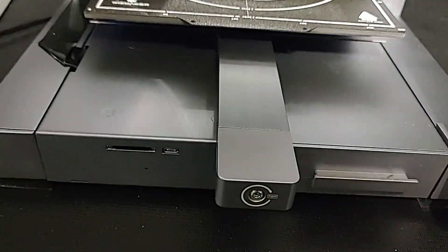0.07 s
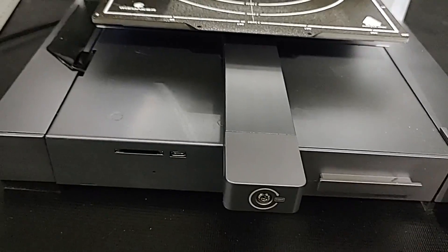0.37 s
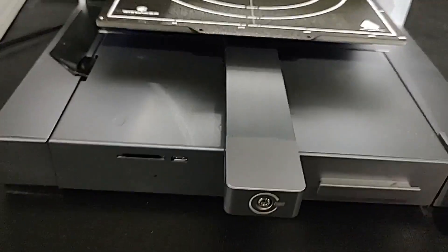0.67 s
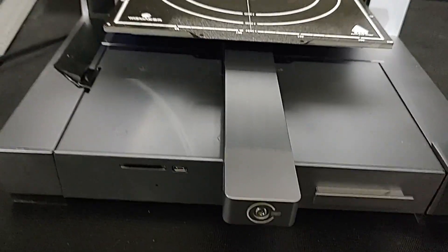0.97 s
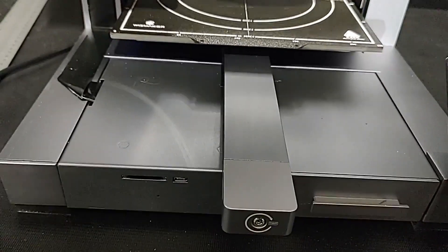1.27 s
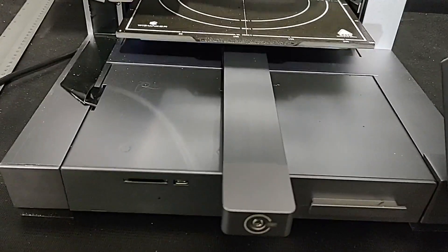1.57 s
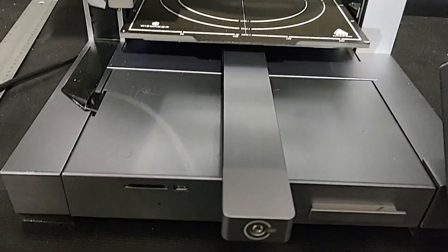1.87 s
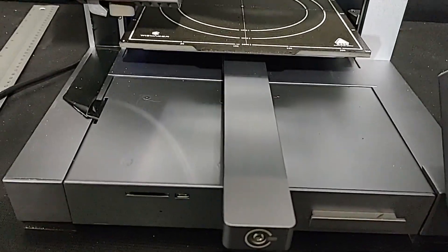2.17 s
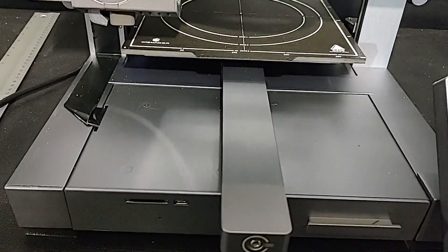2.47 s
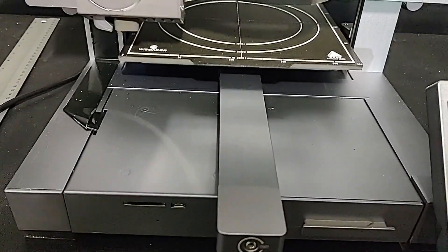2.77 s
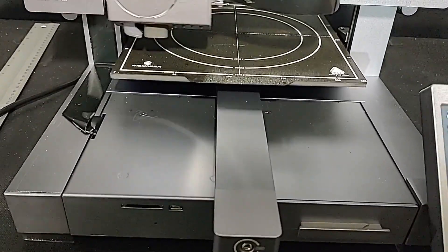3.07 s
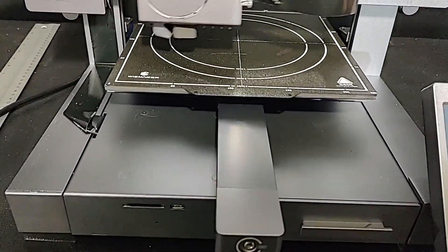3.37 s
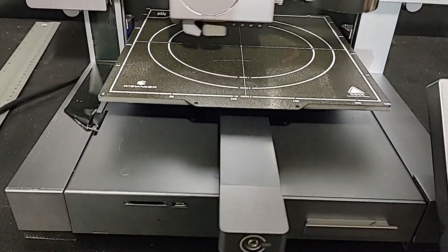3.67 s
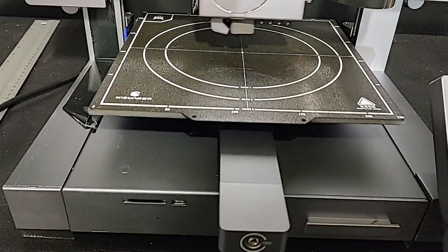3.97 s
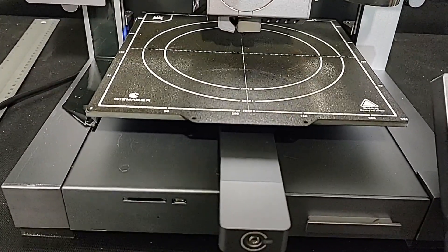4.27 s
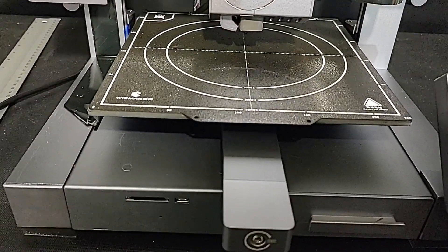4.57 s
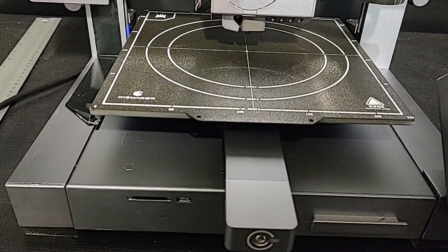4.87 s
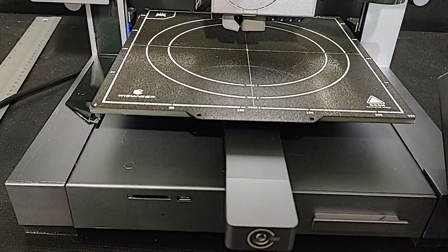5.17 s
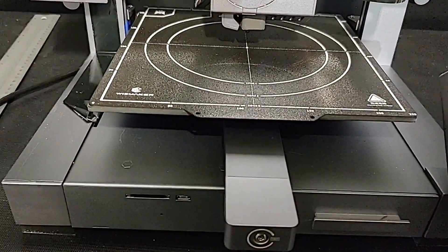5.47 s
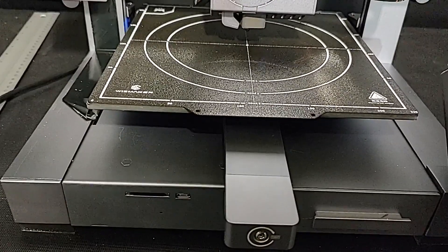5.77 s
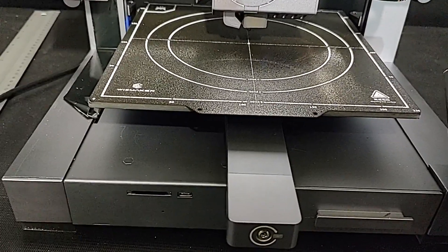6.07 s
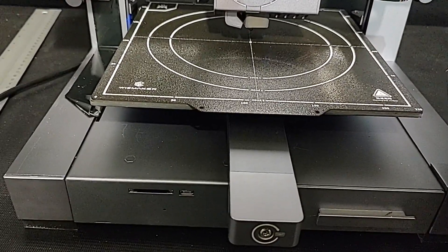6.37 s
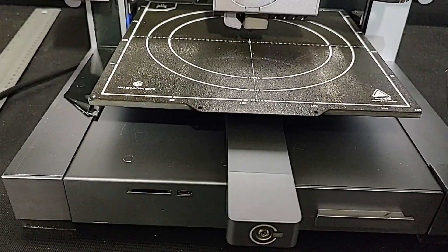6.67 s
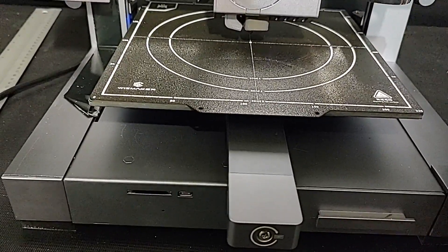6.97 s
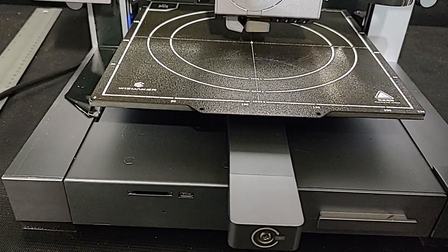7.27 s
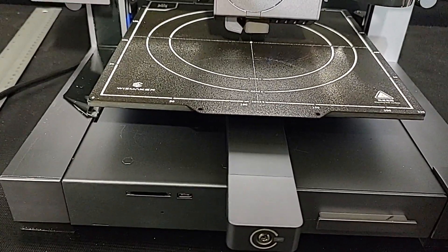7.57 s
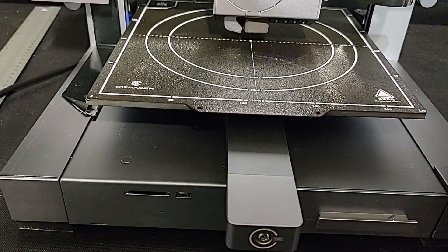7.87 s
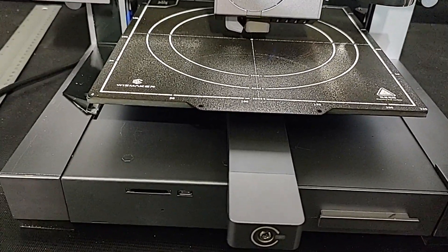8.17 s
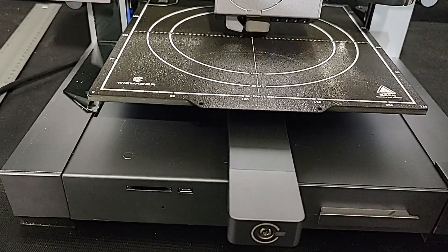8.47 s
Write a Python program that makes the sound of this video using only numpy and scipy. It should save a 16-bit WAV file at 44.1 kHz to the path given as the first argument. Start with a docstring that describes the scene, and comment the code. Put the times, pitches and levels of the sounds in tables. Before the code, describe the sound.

Over a small fan's whine, a desktop 3D printer's switch clicks, then its motors give a short hum and a quieter, rattling drone.

```python
"""Stepper motors home a desktop 3D printer, heard from just in front of its base: the belts drive bed
and head to the centre on one humming note, then the lead screws lower the head with a slow, rattling
drone. Before they move come two faint, high ticks, then an end switch is pressed and released twice,
its spring snapping each time. The frame knocks softly. The head's small fan whines throughout,
ringing its duct, over a broad rush of fans and room."""
import sys
import numpy as np
from scipy import signal
from scipy.fft import rfft, irfft, next_fast_len
from scipy.io import wavfile
from scipy.ndimage import uniform_filter1d

SR = 44100
rng = np.random.default_rng(int(sys.argv[2]) if len(sys.argv) > 2 else 0)


def generate_wav(signal):
    """Clip the signal to [-1, 1] and save it as 16-bit WAV at the path in sys.argv[1]."""
    frames = np.transpose(np.atleast_2d(signal))
    scaled = np.clip(frames, -1, 1) * 32767
    pcm = np.round(scaled).astype(np.int16)
    wavfile.write(sys.argv[1], SR, pcm)


N = 380080
FFT_SIZE = next_fast_len(N, True)
T, HZ = np.arange(N) / SR, np.fft.rfftfreq(FFT_SIZE, 1 / SR) + 1e-3
DESCENT_START_S, DESCENT_LENGTH_S = 4.814, 3.94
STEP_HZ, STEPS_PER_TURN, MICROSTEPS = 99.73, 200, 64  # lead screw motor


# Belt stepper tones at full speed: f/Hz, relative level/dB
BELT_TONES = [(414.6, 0.5), (355, -17), (213, -23), (524, -37.5), (1946, -35.5)]

def belt_hum(start_s=2.944, stop_s=4.188, fade_db_per_s=3, pulley_hz=11.1, ring_s=0.046):
    """The steppers speed up into a frame resonance, hold their note and slow down out of it."""
    shortfall = np.maximum(2.7 * (2.975 - T), 2.33 * (T - 4.135))
    speed = np.clip(1 - shortfall, 0.8, 1)  # share of full speed
    hum = sum(undb(db + 0.4 * walk(90)) * tone(turns(hz * speed), hz, waver_db=0.15, lead_rad=0.15)
              for hz, db in BELT_TONES)
    dip_db = -4.5 * swell(3.562, 0.032)
    pulley_throb_db = 0.9 * np.cos(2 * np.pi * pulley_hz * (T - 3.06))
    level_db = -30.5 - fade_db_per_s * (T - start_s) + dip_db + pulley_throb_db
    running = ramp(start_s, 0.0049) * (1 - ramp(stop_s, 0.0043))
    outside_s = np.maximum(np.maximum(start_s - T, T - stop_s), 0)
    fringe = np.exp(-outside_s / ring_s) * undb(np.where(T < start_s, -20, -13))  # creep in, ring out
    return hum * undb(level_db) * (running + fringe * (1 - running))


# Rolling noise of wheels and belts: f/Hz, density/(dB/Hz)
ROLL_SPECTRUM = [(40, -103), (90, -80.5), (160, -79), (260, -79), (390, -70), (480, -79.5), (650, -90.5),
                 (800, -89.5), (1400, -90.5), (2400, -94), (3500, -102), (7000, -100), (14000, -112)]
# Head carriage resonances: f/Hz, width/Hz, relative level/dB
CARRIAGE_MODES = [(1845, 300, 2.5), (2300, 77, 1), (2780, 420, -3.5)]

def carriage(whine_hz=2280):
    """Wheels and belts roll with a thin whine; rasp and rumble grow as the head comes nearer."""
    rolling = ramp(2.92, 0.037) * (1 - ramp(4.22, 0.033))
    approach = np.clip(T - 4, -1, 0)
    roll = shape(noise(), colour(ROLL_SPECTRUM)) * undb(-1 + 0.31 * approach + walk(30))
    rasp = ringing_noise(CARRIAGE_MODES) * undb(-55 + 0.92 * walk(50))
    whine = tone(2 * np.pi * whine_hz * T, whine_hz, waver_db=1) * undb(-58) * ramp(3.21, 0.21)
    rumble = ringing_noise([(165.7, 21, 0), (215, 19, 0)]) * undb(-50)
    return (roll + whine + (rasp + rumble) * undb(12 * approach)) * rolling


# Lead screw motor lines: multiple of step rate, level/dB, left minus right/dB
SCREW_LINES = [(3, -66, -5), (6, -70.5, -10), (7, -71.5, -2), (8, -69, -5), (15, -65, 5), (16, -53, -9),
               (17, -69, 0), (21, -68, 8), (22, -59.5, 5), (26, -63.5, 1), (32, -64, -1), (78, -69, -8),
               (80, -61, -11), (82, -64, -17)]
# Frame resonances rattled by the screws: f/Hz, width/Hz, relative level/dB
FRAME_MODES = [(1610, 100, -1.5), (1740, 200, -1), (2133, 80, 6), (2690, 68, -2.5), (2863, 150, -5.5),
               (3202, 115, 2)]
# Thread friction: f/Hz, density/(dB/Hz)
RUB_SPECTRUM = [(40, -100), (100, -87.5), (165, -68), (220, -76), (290, -74.5), (330, -101), (380, -82),
                (450, -92.5), (900, -89.5), (1350, -89.5), (1800, -86.5), (2250, -87), (2450, -88.5),
                (3300, -93.5), (4000, -101), (12000, -114)]

def lead_screws(take_up_s=0.71, slack_db=-11.5, tight_spot_s=7.58, line_trim_db=-1.5, sing_hz=4813):
    """The motor drones at twice its step rate; steps rattle the frame; the screws bind once a turn."""
    load = undb(slack_db * np.clip(1 - (T - DESCENT_START_S) / take_up_s, 0, 1))
    strain = undb(2 * swell(7.16, 0.88))
    binding_db = 2 * np.cos(2 * np.pi * (T - tight_spot_s) * STEP_HZ / STEPS_PER_TURN)
    phase = turns(STEP_HZ * (1 + 0.00026 * walk(8)))
    drone = tone(2 * phase, 180, pan_db=0.93, waver_db=0.54) * undb(-47 + binding_db + 1.7 * walk(40))
    whine = sum(undb(db + line_trim_db) * tone(k * phase, k * STEP_HZ, pan_db, 3 if k < 10 else 0.5)
                for k, db, pan_db in SCREW_LINES)
    whistle = undb(-60) * np.sin(MICROSTEPS * phase) * pan(-32)
    sing = tone(2 * np.pi * sing_hz * T, sing_hz) * undb(-71) * swell(5.3, 2.1)
    steps = 0.25 * buzz(phase, SCREW_LINES, count=40)
    shaking = steps + noise(treble_likeness=0.98) * (1 + 0.11 * np.cos(phase))
    rattle = unit(shape(shaking, rings(FRAME_MODES))) * undb(-59 + walk(30))
    friction = noise() + shape(steps, 1 / (1 + (500 / HZ) ** 4)) / 2
    rub = shape(friction, colour(RUB_SPECTRUM)) * undb(-3 + walk(20))
    scrape = ringing_noise([(1725, 200, 0)]) * undb(-55.5) * swell(6.78, 0.29)  # one stretch of thread
    loaded = load * (strain * (drone + rattle) + whine + whistle + rub + scrape)
    return ramp(DESCENT_START_S, 0.035) * (loaded + sing)


# Click resonances: f/Hz, width/Hz, relative level in timbre A/dB, in timbre B/dB
CLICK_MODES = [(3543, 59, -35, 1), (4390, 230, -25.5, -10), (5860, 270, -11.5, -20),
               (7200, 190, -9.5, -9.5), (8010, 260, -18, -5.5), (8590, 195, 3, 1.5), (8996, 250, -0.5, 0),
               (9480, 120, -11, -6), (9750, 190, -5.5, -5), (11620, 260, -15.5, -8), (12360, 330, -20, -12),
               (14000, 760, -23, -17)]
# Two faint, high ticks, then four switch clicks (pressed and released twice):
# t/s, level/dB, timbre (0 = A, 1 = B), left minus right/dB, pitch ratio of the upper modes
TICKS_AND_CLICKS = [(0.144, -28.5, 0.9, 7, 1.09), (0.5987, -33, 0.7, 5, 0.98), (1.999, -15.5, 0, 3.5, 0.99),
                    (2.158, -17, 0.71, 4, 1), (2.6307, -15, 0.03, 3, 0.992), (2.8136, -17, 0.74, 3.5, 1)]

def ticks_and_clicks(trim_db=1.6, snap_s=0.00071, case_s=0.0064, room_s=0.026, upper_above_hz=8000):
    """Two faint ticks; then the switch spring snaps four times, scattered by head case and room."""
    out, size = np.zeros((2, N)), 8192
    t, f = np.arange(size) / SR, np.fft.rfftfreq(size, 1 / SR) + 1e-3
    attack = 1 - np.exp(-t / 0.00069)
    decay = np.exp(-t / snap_s) + undb(-10) * np.exp(-t / case_s) + undb(-23) * np.exp(-t / room_s)
    # Small parts radiate no bass.
    body_highpass, crack_highpass = (1 / np.sqrt(1 + (hz / f) ** 16) for hz in (3500, 10000))
    for s, db, timbre, pan_db, pitch in TICKS_AND_CLICKS:
        body = sum((-1) ** k * undb(a_db + (b_db - a_db) * timbre)
                   * resonance(f, hz * (pitch if hz > upper_above_hz else 1), width)
                   for k, (hz, width, a_db, b_db) in enumerate(CLICK_MODES))
        ring = irfft(rfft(rng.standard_normal((2, size))) * body * body_highpass)
        ring /= np.sqrt(uniform_filter1d(ring ** 2, size // 128) + 1e-18)  # flatten the envelope
        crack = unit(irfft(rfft(rng.standard_normal((2, size))) * crack_highpass))
        crack *= undb(-9) * np.exp(-t / 0.0014)
        click = (ring * decay + crack * pan(pan_db)) * attack
        start = int(s * SR)
        out[:, start:start + size] += click * undb(db + trim_db) * pan(pan_db)
    return out


# Frame knocks: t/s, f/Hz, decay rate/(1/s), level/dB
FRAME_KNOCKS = [(2.02, 83.7, 25, -55.5), (6.411, 1200, 500, -38), (6.412, 2000, 900, -37),
                (6.444, 500, 150, -39), (8.174, 145.5, 32, -36.5), (8.25, 119, 23.8, -39.5)]

def frame_knocks():
    """Damped thuds as the frame settles; each soft contact swells over one cycle."""
    out = np.zeros(N)
    for s, hz, decay_per_s, db in FRAME_KNOCKS:
        t = np.maximum(T - s, 0)
        envelope = np.minimum(hz * t, 1) * np.exp(-np.minimum(decay_per_s * t, 30))
        out += undb(db) * np.sin(2 * np.pi * hz * t) * envelope
    return out


# Head fan lines: multiple of shaft rate, level parked/dB, over bed/dB, lowered/dB, left minus right/dB
FAN_LINES = [(10, -76, -76, -76, -6), (12, -80, -78, -73, 2), (20, -77, -78, -65, -9),
             (25, -76, -76, -68, 5), (27, -74, -69, -69, 7), (28, -73, -66, -64, 7),
             (29, -76, -74, -72, -1), (32, -78, -69, -69, 3), (40, -83, -74, -69, 5),
             (44, -76, -69, -75, -2), (54, -67, -80, -76, -2), (55, -73, -75, -86, 0),
             (56, -65, -75, -68, -1), (57, -71, -82, -77, -2), (58, -66, -72, -73, 2),
             (68, -74, -85, -76, 3), (72, -70, -75, -79, -3), (79, -68, -84, -68, -5),
             (81, -77, -72, -67, -1), (88, -71, -75, -73, -1), (92, -73, -72, -68, -12),
             (94, -71, -73, -64, -6), (96, -66, -65, -63, -12), (98, -65, -76, -62, -12),
             (101, -78, -71, -69, -9), (103, -73, -70, -65, -6), (109, -71, -80, -75, 5),
             (110, -70, -85, -73, 10), (111, -67, -74, -79, 9), (113, -67, -79, -75, 16),
             (114, -72, -66, -79, 17), (121, -74, -74, -85, 10)]

def head_fan(free_hz=81.05, blocked_hz=81.19):
    """Each shaft turn repeats one rough buzz; the fan runs faster when the bed half blocks its outlet."""
    over_bed, _ = head_position()
    sunk = ramp(5.35, 0.4)
    phase = turns((free_hz + (blocked_hz - free_hz) * over_bed) * (1 + 0.00025 * walk(12)))
    lines = 0
    for k, parked_db, bed_db, low_db, pan_db in FAN_LINES:
        db = parked_db + (bed_db - parked_db) * over_bed + (low_db - bed_db) * sunk
        lines += tone(k * phase, k * free_hz, pan_db, waver_db=1.5) * undb(db + vent_beam_db(k * free_hz))
    blades = buzz(phase, FAN_LINES, count=185)
    tint = colour([(300, 7), (2000, 9), (3000, 4), (4000, 9.5), (6000, 9),
                   (10500, 7), (12000, -22), (15000, -6)])
    direct = unit(shape(blades, tint)) * undb(-66 - 2 * over_bed)
    return lines + fan_duct(blades, phase) + direct


# Duct resonances: f/Hz, width/Hz, left minus right/dB, tick depth, level parked/dB,
# gain over bed/dB, gain lowered/dB
DUCT_MODES = [(4570, 370, -0.5, 0.77, -62, -13.5, 4), (5500, 230, 2, .5, -79.5, -8, -3),
              (6540, 340, -2, 1.3, -73, 2, 12), (7840, 640, -10.5, 0.21, -67.5, 2, 14),
              (9250, 1000, 37, 4.8, -64.5, 0, -6)]

def fan_duct(blades, phase, tick_turns=0.12):
    """Blade buzz and air stream ring the duct, pulsed by one bearing tick a turn."""
    over_bed, lowered = head_position()
    source = blades + 1.3 * noise()
    tick = np.exp(-(phase / (2 * np.pi) % 1) / tick_turns)
    out = 0
    for hz, width, pan_db, depth, parked_db, bed_db, low_db in DUCT_MODES:
        ring = unit(shape(source * (1 + depth * tick), rings([(hz, width, 0)])))
        db = parked_db + bed_db * over_bed + low_db * lowered + 1.57 * vent_beam_db(hz)
        out += ring * pan(pan_db) * undb(db)
    return out


# Vent beams: f/Hz, t/s of passing the listener, gain/dB
VENT_BEAMS = [(2600, 1.3, -4.5), (3570, 1.8, 5.5), (4540, 2.6, 1), (6030, 1.4, 7), (6360, 0.73, 1),
              (7800, 2.56, 2.5), (9200, 2.37, 5)]

def vent_beam_db(hz):
    """The vent beams each pitch its own way; gain as the beam at hz sweeps past the listener."""
    knots_hz, *columns = np.transpose(VENT_BEAMS)
    pass_s, gain_db = (np.interp(hz, knots_hz, column) for column in columns)
    return gain_db * swell(pass_s, 0.96)


# Fan air glancing off the bed: f/Hz, width/Hz, relative level/dB
WHIRR_BANDS = [(399, 134, 1), (1820, 240, -1.5), (2680, 330, -2.5), (3520, 400, -5), (4110, 130, -13)]

def bed_whirr():
    """Once the head is over the bed, the plate throws the fan's rush towards the listener."""
    return ringing_noise(WHIRR_BANDS) * undb(-61 + 2.2 * walk(11)) * ramp(4.08, 0.21)


# Air swishes: t/s, half-length/s, f/Hz, width/Hz, level/dB
EDGE_SWISHES = [(0.503, 0.093, 7950, 300, -57), (0.55, 0.14, 4600, 350, -58), (1.5, 0.49, 9100, 200, -59),
                (3.082, 0.22, 7400, 600, -59.5), (3.53, 0.17, 7780, 349.7, -58.5),
                (4.05, 0.35, 10200, 450, -74)]

def edge_swishes(flutter_db=4):
    """The fan's air stream catches edges as the head moves; each gives a half-whistled swish."""
    stream, flutter = noise(), undb(flutter_db * walk(25))
    return flutter * sum(unit(shape(stream, rings([(hz, width, 0)]))) * undb(db) * swell(s, half_s)
                         for s, half_s, hz, width, db in EDGE_SWISHES)


def air_hiss():
    """The bright edge of the air stream, with one brief swish."""
    tint = colour([(6000, -12.5), (9000, -0.5), (10200, 1.5), (12000, -9), (15500, -10.5)])
    hiss = unit(shape(panel_echo(noise()), tint))
    envelope = undb(-66 + 1.1 * walk(9)) + undb(-53) * swell(3.18, 0.062)
    return hiss * envelope * pan(10)


# Blade tone of the base fan: t/s, level/dB
BASE_FAN_LEVELS = [(0, -67.5), (.7, -66), (2, -72), (2.8, -72), (3.6, -62.5), (4.6, -72.5), (5.6, -63.5),
                   (8.62, -63.5)]

def base_fan(blade_hz=1153):
    """The fan in the base sounds one blade tone that swells and fades."""
    level_db = np.interp(T, *np.transpose(BASE_FAN_LEVELS))
    phase = turns(blade_hz * (1 + 0.003 * walk(45)))
    return undb(level_db) * tone(phase, blade_hz, pan_db=-3, waver_db=1.3, lead_rad=1.7)


def faint_tones(thin_hz=1260, hum_hz=370.3):
    """A thin tone and a low hum, both wavering."""
    thin = tone(turns(thin_hz * (1 + 0.001 * walk(20))), thin_hz, lead_rad=0.8)
    hum = tone(turns(hum_hz * (1 + 0.00439 * walk(10))), hum_hz)
    return undb(-75) * thin + undb(-71) * hum


def rustle():
    """A faint, grainy rustle just before the first switch press."""
    tint = colour([(200, -2), (600, 3), (1600, 2), (3000, 0), (9000, -2), (15000, -23)])
    return unit(shape(noise(), tint)) * undb(-60.5 + 2.2 * walk(70)) * swell(1.77, 0.26)


def handling_rumble():
    """A soft, low handling rumble swells around the first switch press."""
    tint = colour([(30, -20), (80, 2), (250, -4), (400, 3), (700, -18), (2000, -38)])
    return unit(shape(noise(), tint)) * undb(-61) * swell(2.08, 0.27)


# Rush of fans and room: f/Hz, density/(dB/Hz)
RUSH_SPECTRUM = [(25, -109.0), (50, -100.0), (85, -86.5), (170, -85), (250, -88), (390, -87), (500, -99),
                 (750, -100.0), (1500, -99), (3000, -98.5), (6500, -94.5), (10000, -101.5), (12000, -111.0),
                 (15000, -118.0)]

def room_rush(bass_hz=90, treble_hz=4500):
    """Broad rush of fans and room; the bed shades its treble, its bass sinks between the two moves."""
    over_bed, lowered = head_position()
    low, high = 1 / (1 + (HZ / bass_hz) ** 4), 1 / (1 + (treble_hz / HZ) ** 8)
    source, tint = noise(), colour(RUSH_SPECTRUM)
    bass = shape(source, tint * low) * undb(-7 * swell(4.76, 0.33) + 2 * lowered)
    middle = shape(source, tint * (1 - low - high))
    treble = shape(panel_echo(source), tint * high) * undb(-6 * over_bed + 3 * lowered)
    return (bass + middle + treble) * undb(ramp(2.1, 0.22) - 0.5 + walk(4.9))


def head_position():
    """Head travel, each 0-1: out over the bed, then steadily down."""
    return ramp(3.53, 0.2), np.clip((T - DESCENT_START_S) / DESCENT_LENGTH_S, 0, 1)


def panel_echo(x, delay_s=0.001535, gain=0.42):
    """A drifting echo off a nearby panel adds half-whistled peaks."""
    echo_t = T - delay_s * (1 + 0.005 * walk(2))
    echo = np.array([np.interp(echo_t, T, channel) for channel in x])
    return (x + gain * echo) / np.hypot(1, gain)


def buzz(phase, lines, count, size=8192, scatter_db=2.5):
    """One rough cycle, repeated: the weak harmonics between a motor's strong lines."""
    weak = ~np.isin(np.arange(count), [0] + [row[0] for row in lines])
    phasors = np.exp(2j * np.pi * rng.random((2, count)))
    cycle = irfft(phasors * undb(scatter_db * rng.standard_normal(count)) * weak, size)
    index = (phase / (2 * np.pi) % 1 * size).astype(int) % size
    return unit(cycle[:, index])


def tone(phase, spread_hz, pan_db=0, waver_db=2, lead_rad=0.42):
    """Sine of wavering level; the left-right phase difference grows with spread_hz."""
    apart_rad = min(lead_rad + spread_hz / 3500, np.pi / 2)
    offset = rng.uniform(0, 2 * np.pi) + np.array([[0.5], [-0.5]]) * apart_rad
    return np.sqrt(2) * np.sin(phase + offset) * pan(pan_db) * undb(waver_db * walk(5))


def noise(bass_likeness=0.92, treble_likeness=0.09, crossover_hz=900):
    """Stereo white noise with one left-right correlation in the bass, another in the treble."""
    mid, side = rng.standard_normal((2, N))
    alike = treble_likeness + (bass_likeness - treble_likeness) / (1 + (HZ / crossover_hz) ** 2)
    mid, side = shape(mid, np.sqrt((1 + alike) / 2)), shape(side, np.sqrt((1 - alike) / 2))
    return np.array([mid + side, mid - side])


def ringing_noise(modes):
    """Noise through resonances, rms 1."""
    return unit(shape(noise(), rings(modes)))


def rings(modes):
    """Steep response of resonances: f/Hz, width/Hz, level/dB."""
    return sum(undb(db) * np.abs(resonance(HZ, hz, width)) ** 2 for hz, width, db in modes)


def resonance(f, hz, width_hz):
    """One damped resonance, gain 1 at its centre."""
    return 1 / (1 + 1j * (f / hz - hz / f) * hz / width_hz)


def colour(points):
    """Response that gives white noise a spectrum: f/Hz, density/(dB/Hz)."""
    hz, db = np.transpose(points)
    return undb(np.interp(np.log(HZ), np.log(hz), db)) * np.sqrt(SR / 2)


def shape(x, response):
    """Filter by a frequency response."""
    return irfft(rfft(x, FFT_SIZE) * response, FFT_SIZE)[..., :N]


def turns(hz):
    """Phase in radians of a rotation at hz."""
    return 2 * np.pi * np.cumsum(hz) / SR


def walk(rate_hz):
    """Smooth random wander, spread near 1."""
    hop = int(SR / rate_hz)
    knots_s = np.arange(N // hop + 2) * hop / SR
    return 1.228 * uniform_filter1d(np.interp(T, knots_s, rng.standard_normal(len(knots_s))), hop // 2)


def ramp(at_s, half_s):
    """Smooth step from 0 to 1."""
    return 0.5 + 0.5 * np.tanh((T - at_s) / half_s)


def swell(at_s, half_s):
    """Gaussian bump of height 1."""
    return np.exp(-((T - at_s) / half_s) ** 2)


def pan(db):
    """Stereo gains for a left-minus-right level."""
    return unit(undb(np.array([[db], [-db]]) / 2))


def unit(x):
    """Scale to rms 1."""
    return x / np.sqrt(np.mean(x ** 2))


def undb(db):
    """Decibels to gain."""
    return 10 ** (np.asarray(db) / 20)


def scene():
    """Motors, clicks and small noises over the fans and room."""
    air = head_fan() + bed_whirr() + edge_swishes() + room_rush() + air_hiss() + base_fan()
    background = air + faint_tones()
    motion = belt_hum() + carriage() + lead_screws()
    return motion + ticks_and_clicks() + frame_knocks() + rustle() + handling_rumble() + background


def record(dry, top_hz=15800):
    """Steep low-pass on the top treble."""
    return signal.sosfilt(signal.ellip(8, 0.2, 70, top_hz, fs=SR, output="sos"), dry)


dry = scene()
out = record(dry)
generate_wav(out)
```